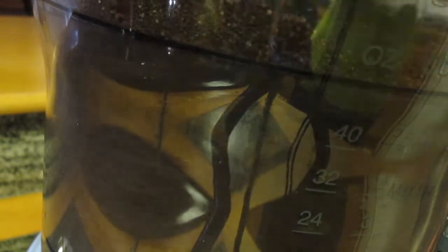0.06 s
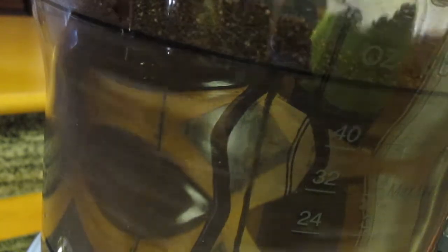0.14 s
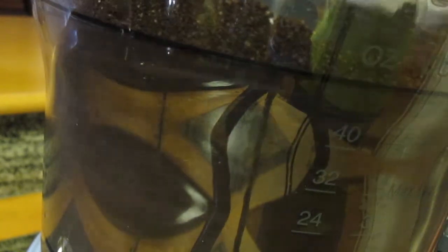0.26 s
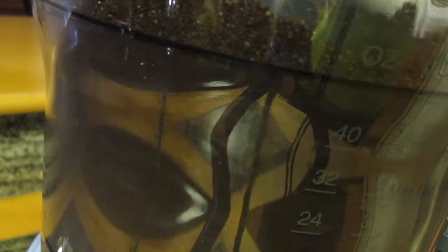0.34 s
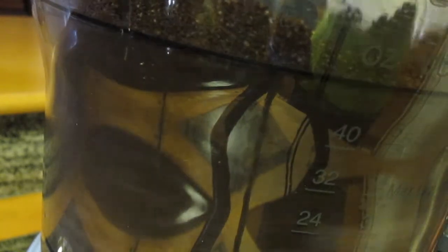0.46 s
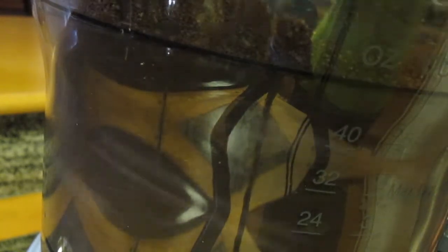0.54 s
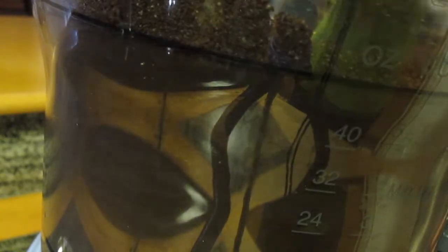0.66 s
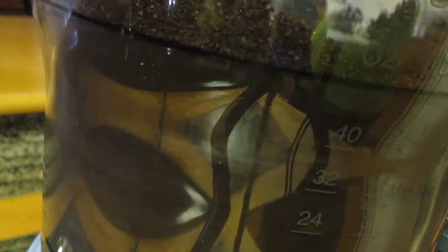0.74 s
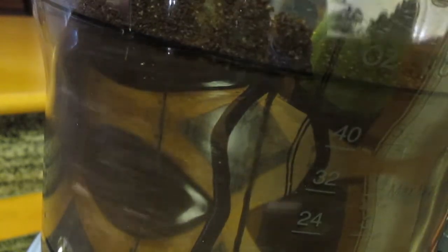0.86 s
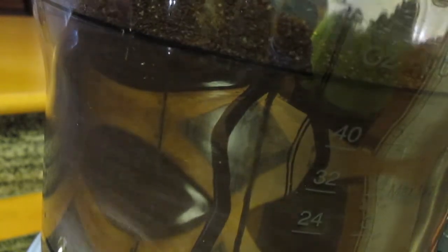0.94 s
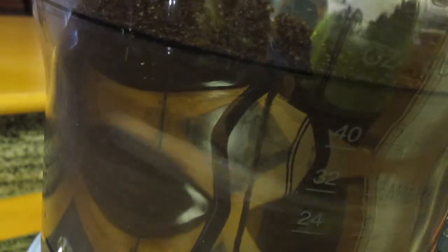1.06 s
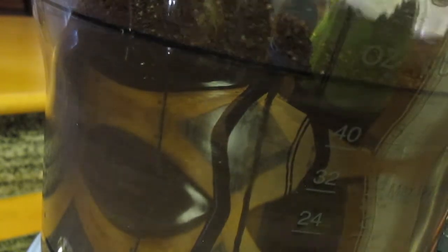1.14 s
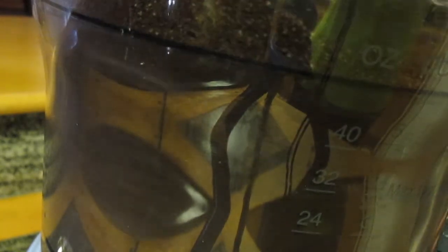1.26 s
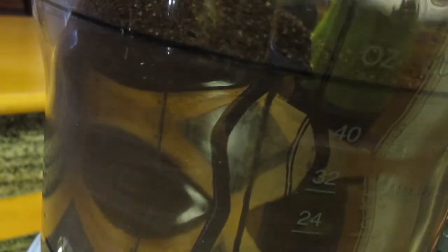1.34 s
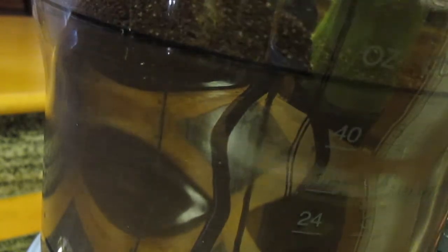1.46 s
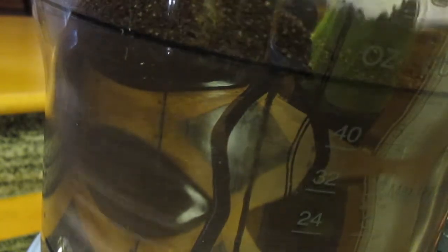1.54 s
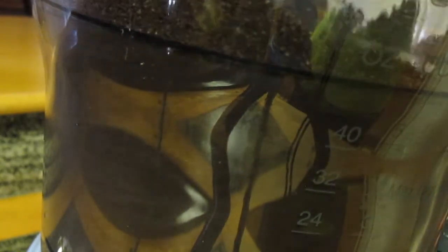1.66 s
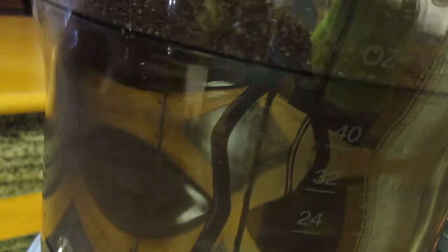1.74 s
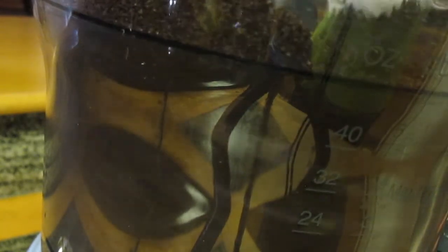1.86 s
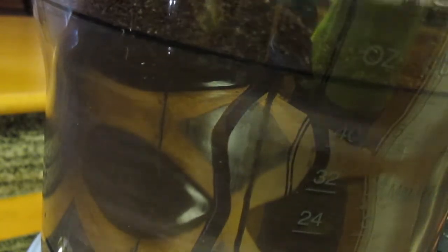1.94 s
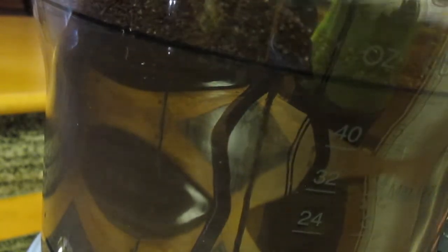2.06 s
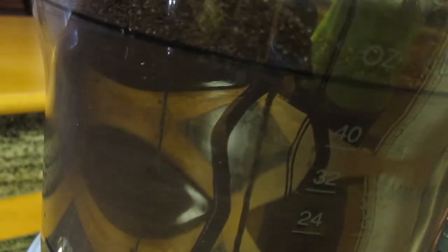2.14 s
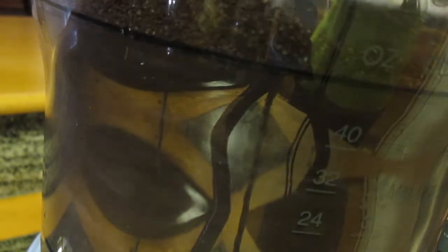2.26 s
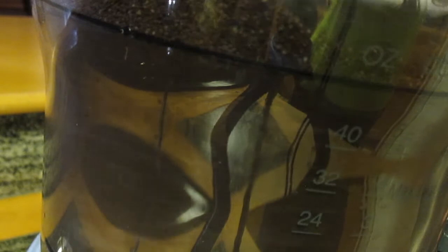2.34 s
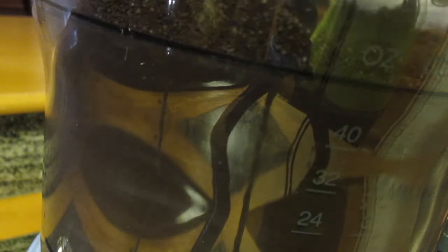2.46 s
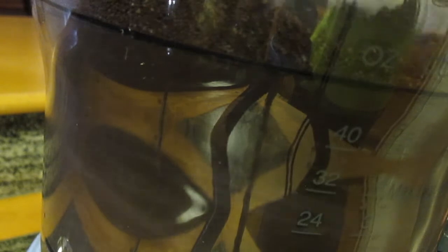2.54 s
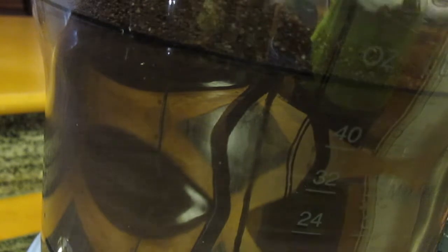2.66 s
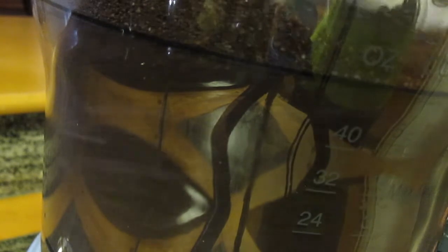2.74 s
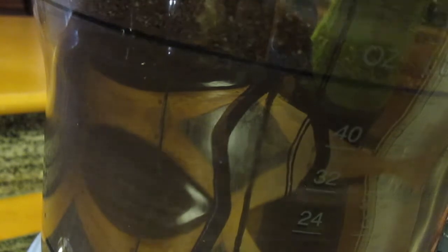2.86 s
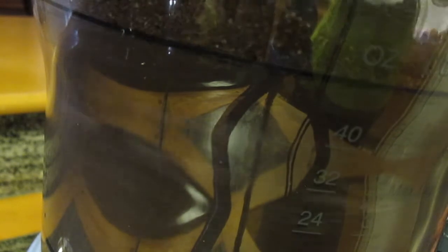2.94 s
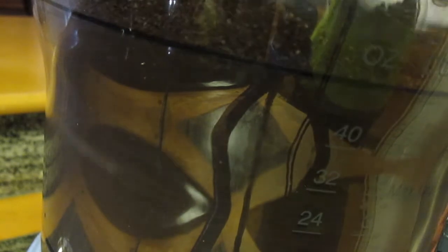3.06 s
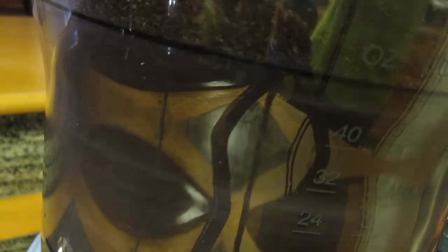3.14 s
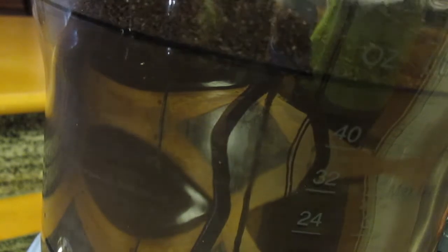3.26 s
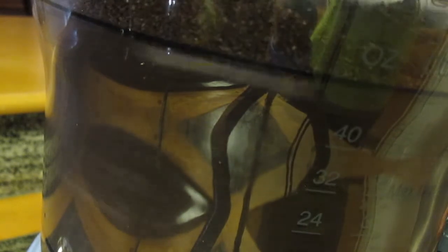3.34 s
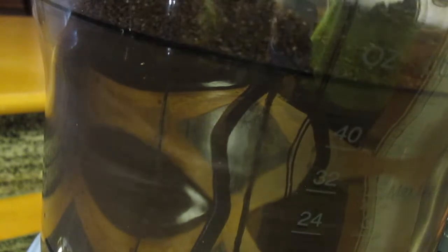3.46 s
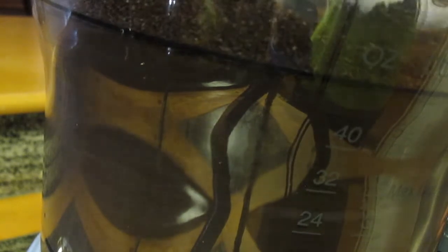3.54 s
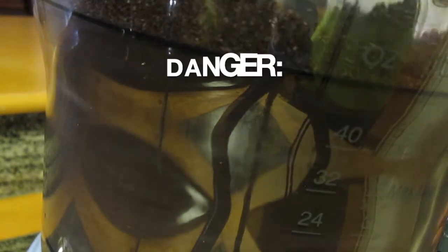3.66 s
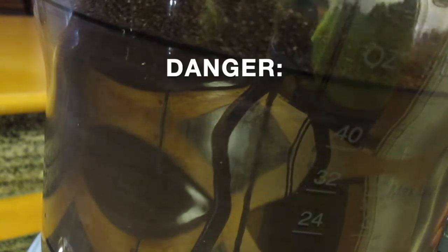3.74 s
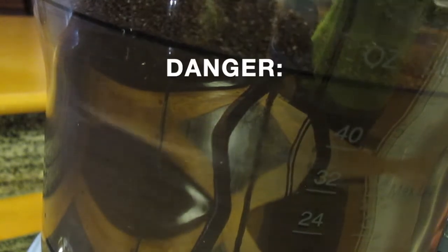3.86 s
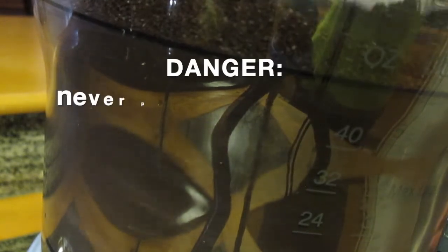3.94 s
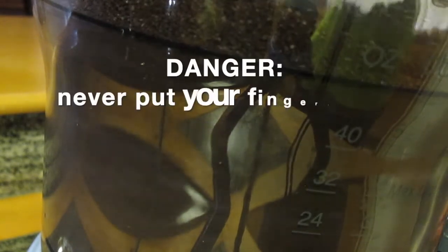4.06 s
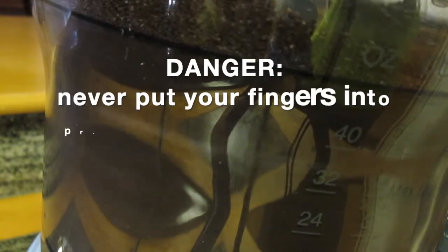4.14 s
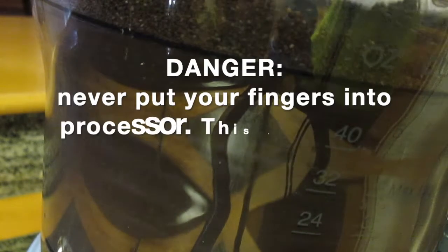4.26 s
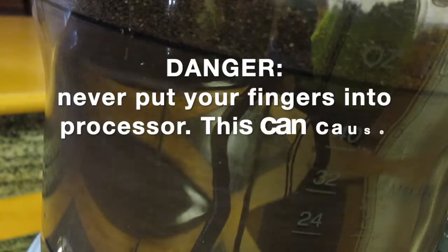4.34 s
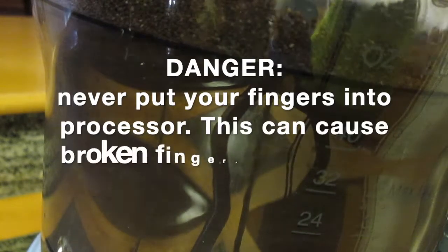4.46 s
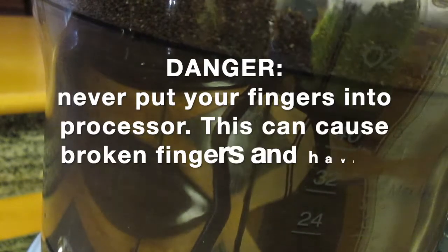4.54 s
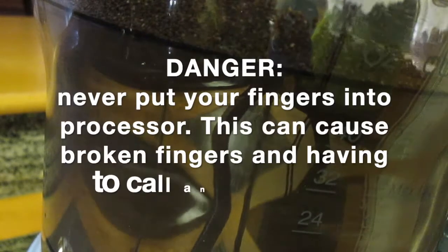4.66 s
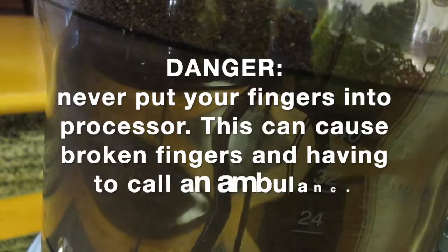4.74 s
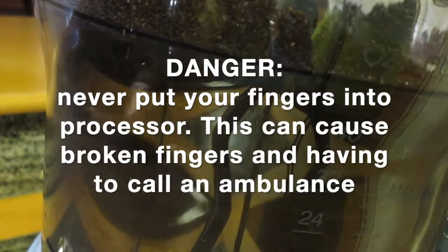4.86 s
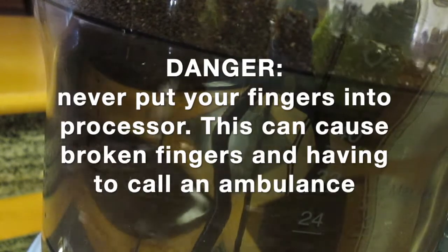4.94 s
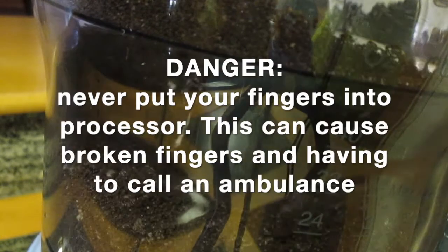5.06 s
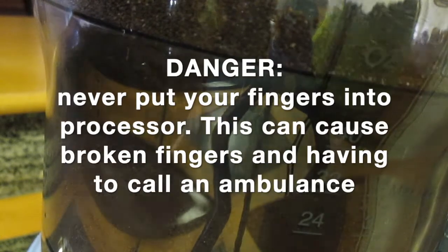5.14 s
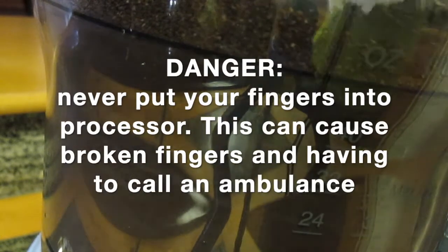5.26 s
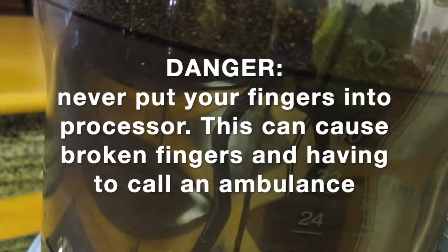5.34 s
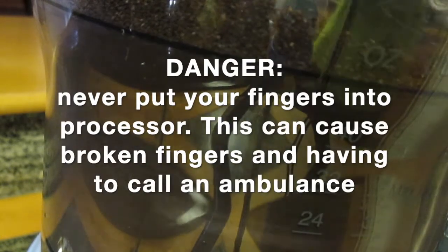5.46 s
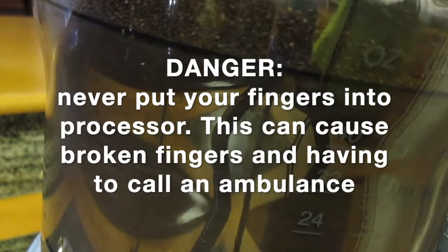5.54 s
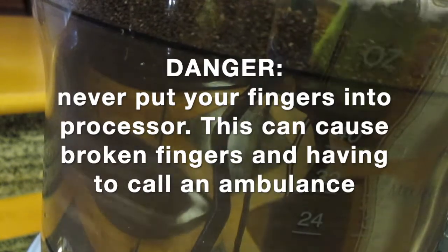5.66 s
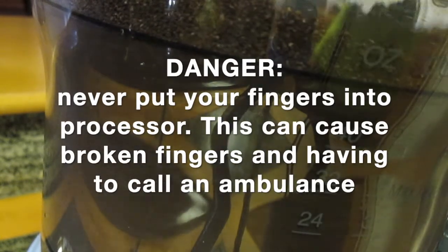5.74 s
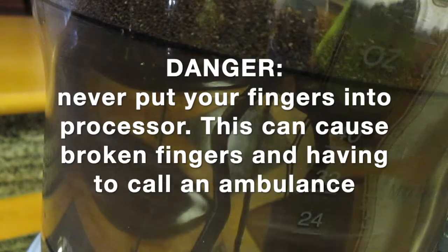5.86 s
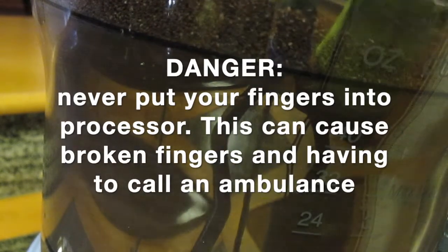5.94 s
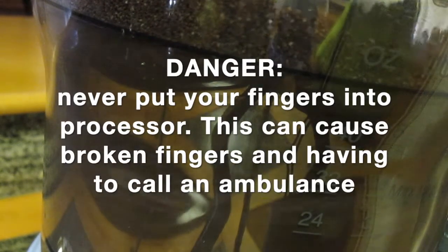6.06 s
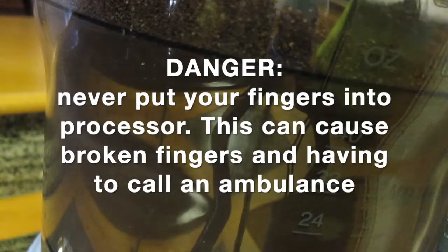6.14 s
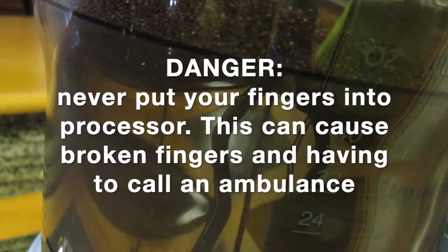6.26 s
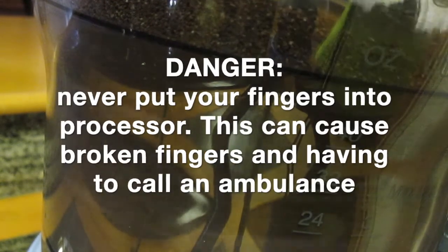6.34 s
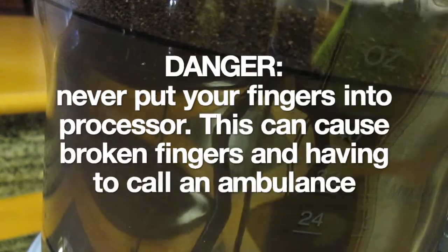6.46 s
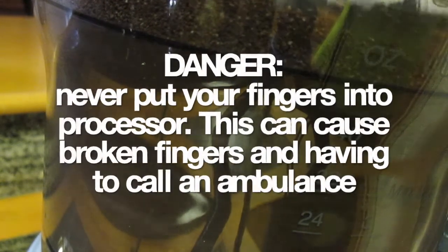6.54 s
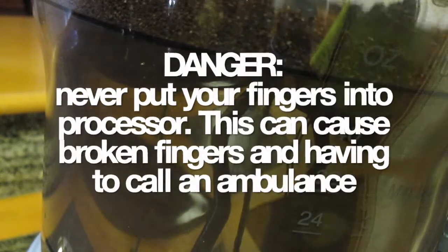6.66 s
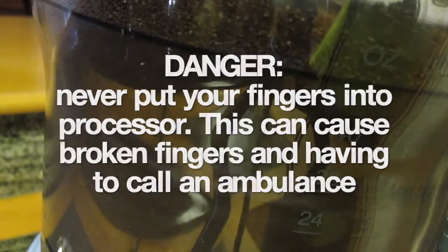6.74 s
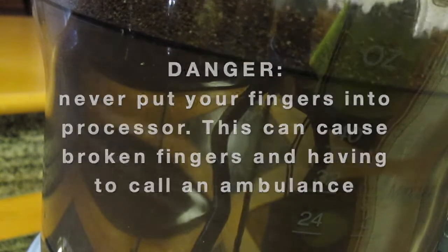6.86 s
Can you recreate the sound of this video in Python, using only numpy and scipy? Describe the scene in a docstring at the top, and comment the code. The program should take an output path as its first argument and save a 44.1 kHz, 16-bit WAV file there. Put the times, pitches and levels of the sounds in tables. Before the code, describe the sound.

Close to the microphone in a small kitchen, a food processor runs in seven pulses. Hard cookie pieces clatter against the plastic bowl, thump its base and snap, while crumbs tick brightly. After each release the rattle thins and the motor whine glides down into a brief quiet gap with faint hum. Later pulses last longer, and the final one runs to the end.

```python
"""Food processor chopping cookies

A food processor chops hard cookies in seven pulses, close to the microphone in a small kitchen.
The blade flings pieces at the plastic bowl: random blows ring the base (chunks) and the wall (bits),
and short noise bursts make the crumbs tick. Larger pieces snap now and then.
The motor, a stack of sine tones, whines up at each pulse and glides down as it coasts.
Quiet room air (shaped noise) and a faint steady hum lie underneath."""
import sys
import numpy as np
from scipy import signal
from scipy.fft import rfft, irfft
from scipy.io import wavfile
from scipy.ndimage import uniform_filter1d

SR = 44100
rng = np.random.default_rng(int(sys.argv[2]) if len(sys.argv) > 2 else 0)


def log_audio(samples):
    """Write samples as a 16-bit WAV file to the path given in sys.argv[1]."""
    # one column per channel
    frames = np.atleast_2d(samples).T
    # limit to full scale, then quantise
    limited = np.clip(frames, -1, 1)
    pcm = np.round(limited * 32767).astype(np.int16)
    wavfile.write(sys.argv[1], SR, pcm)


N = 304290  # samples, about 6.9 s
TIME = np.arange(N) / SR  # seconds
TAPS = 4096  # samples in one ring or spectrum response

# The switch is held down; the rattle weakens while it is:
# (on [s], off [s], rattle at start [dB], rattle at release [dB],
#  crumbs against rattle [dB], chunks against rattle [dB])
PULSES = [(-.12, 0.339, -12, -22, -11, -11.5), (0.919, 1.347, -15.5, -17.5, -11, -11.5),
          (1.844, 2.422, -16.5, -21, -10.5, -11.5), (2.77, 3.435, -15, -20, -10, -11),
          (3.709, 4.40, -15, -19, -10, -13), (5.126, 5.872, -14.5, -20, -11.5, -13),
          (6.118, 7.0, -15, -19, -10.5, -12)]
# The rattle surges or dips briefly, with heavier or lighter thumps:
# (time [s], length [s], rattle change [dB], extra change of chunks [dB])
SURGES = [(0.072, .04, 3.5, 4.5), (0.167, 0.019, -5, 10), (0.376, 0.033, 4.5, -5), (.484, 0.024, 4, -8),
          (.57, 0.048, 2, -6), (.62, .03, 1.5, -1), (.985, 0.016, 1, 2), (1.112, 0.13, 4, 1.5),
          (1.267, 0.025, 1.5, -2), (1.652, 0.043, -1.5, 0), (1.933, 0.11, 5, -1), (2.098, 0.038, 4.5, -6),
          (2.343, 0.083, 1.5, 2), (2.435, 0.034, 4.5, -3), (2.52, 0.11, 3.5, -1), (2.883, 0.016, 1, 9),
          (3.013, 0.092, 3.5, -1.5), (3.25, 0.031, 2, 0), (3.557, 0.026, 4, -8), (3.8, .03, 2, -2),
          (4.36, 0.072, 1, 5), (4.735, 0.12, 2.5, 6), (4.83, 0.033, 3.5, -3), (5.162, 0.068, 4, 2.5),
          (5.345, 0.031, 1, 5), (5.406, 0.0092, 3, 1), (5.799, 0.015, 5, -1), (5.945, .03, 3, 3),
          (6.035, 0.056, 5, 2), (6.15, 0.031, -0.5, 3), (6.356, 0.018, -0.5, 0)]
# A slower blade throws softer; the last three levels are set against the rattle:
# (share of full speed [0-1], rattle [dB], crumbs [dB], chunks [dB], whine [dB])
THROW_LEVELS = [(0, -37.5, 5, 11, -17), (.06, -26, 2.5, 0, -16), (.14, -17, -1.5, -4, -14),
                (.26, -10, -1.5, -1, -8.5), (.5, -4.5, -1, 1, -8.5), (.9, -1, -1.5, 1, -21),
                (1, -0.5, 1, -0.5, -17)]
# Ringing modes of the bowl and lid: (frequency [Hz], width [Hz], relative level [dB])
BOWL_MODES = [(489.2, 55.5, -6.5), (527, 4.7, -21), (601, 119, -7.5), (719, 53, -6.5), (812, 42, -5),
              (866, 17.4, -1.5), (918.3, 37.6, -0.5), (966, 34, -11), (1010, 134, -7), (1249, 66, -4.5),
              (1367, 156, -6.5), (1362, 84, -12.5), (1562, 15, -8), (1627, 35, -6), (1874, 113, -14),
              (2129, 64, -6.5), (2246, 8, -6.5), (2317, 114, -12), (2570, 123, -13), (2800, 74, -18.5),
              (2980, 180, -21.5), (3100, 106, -18.5), (3370, 63, -18.5), (3850, 190, -17.5)]
# The rattle's brightness wavers and is highest near the end: (time [s], treble change [dB])
BRIGHTNESS = [(0, 1), (1.3, -1), (2.5, 2), (4.2, 2), (5.5, 1), (6.6, 4)]
# Ringing modes of the motor base on the counter: (frequency [Hz], width [Hz], relative level [dB])
BASE_MODES = [(68, 23, -8), (101.7, 11, 2.5), (130.6, 29, -1), (148, 16, -4.5), (206, 54, -2.5),
              (226.3, 34, 0.5), (261.6, 20, 1), (324, 39, -7.5), (428, 134, -6.5)]
# Spectrum of a crumb's tick: (frequency [Hz], relative level [dB])
CRUMB_SPECTRUM = [(1500, -31), (3200, 5.5), (4300, 0), (5800, -1), (7500, -4.5), (8400, -2), (10500, -5.5),
                  (12000, -9), (14000, -15), (15700, -21)]
# Partials of the whine: (multiple of base pitch [ratio], typical level [dB])
WHINE_PARTIALS = [(1, -7), (1.5, -7.5), (2, -9), (2.5, -11), (3, 0.5), (4, -5.5), (5, -2)]
# Spectrum of the quiet kitchen's air: (frequency [Hz], relative level per Hz [dB])
AIR_SPECTRUM = [(15, -34), (25, 1), (172, 0), (250, -5), (691, -9), (811, -19), (978, -8), (2850, -53),
                (3090, -46), (6540, -28), (7090, -44), (15000, -44)]
# The blade snaps a large piece: (time [s], level [dB], knock against that level [dB])
SNAPS = [(.0737, -16, -8), (.1511, -20.5, -13), (.158, -14, -3), (.389, -15.5, -4), (.46, -20, 4),
         (.943, -15, -6), (1.0111, -16, -7), (1.2615, -14, 9), (1.3234, -14, 6), (2.143, -14, 6),
         (2.2293, -13, -11), (2.2762, -15, 4), (2.4894, -15.5, -2), (2.5691, -20, 2), (2.892, -15, 6),
         (2.9901, -10, -3), (3.0724, -10, 0), (3.1113, -11, 0), (3.243, -13.5, 7), (3.733, -13.5, -5),
         (3.983, -13, -6), (4.0607, -9, -14), (4.3031, -24, 1), (4.5594, -20.5, 2), (5.148, -10, -9),
         (5.2111, -6.5, 0), (5.3477, -14.5, 2), (5.4026, -14, 8), (5.743, -16.5, -5), (5.7972, -18, -9),
         (6.256, -10.5, -5), (6.295, -16, -3), (6.583, -12, -1), (6.8443, -13.5, 2)]
# The pulse switch clicks under the finger, loose bits settle:
# (time [s], level [dB], knock against that level [dB])
TICKS = [(.707, -32, 1), (.906, -52, 10), (1.814, -61, 35), (4.936, -37, -14), (5.03, -58, 14)]

SPIN_UP_S, COAST_S = .065, .28  # time constants of the motor
BITE_S = 0.022  # the first jolt sets the pieces flying well before the blade is up to speed
FRICTION = .13  # dry friction that stops the blade, as a share of the drag at full speed
CRUMB_FADE_DB, CRUMB_LAG_S = -1, 0.033  # crumbs start a little quieter: they have yet to be cut
TOP_SPEED_HZ = 2540  # base pitch of the whine at full speed
WHINE_WOBBLE = .015  # spread of the pitch, as a share of it
WHINE_DIRECT = .34  # gain of the whine that does not pass through the bowl
BURIED_DB = -8  # while the blade spins up, the first rush of pieces buries the whine
AIR_DB, HUM_DB, HUM_HZ = -48.5, -53, 60.7
NOTCH_HZ, TOP_HZ = 7850, 15550


def undb(db):
    """Turn decibels into a gain."""
    return 10 ** (np.asarray(db) / 20)


def unit(x):
    """Scale a signal to an average (rms) size of 1."""
    return x / np.sqrt(np.mean(x ** 2))


def walk(rate):
    """Smooth random curve that turns about rate times a second; spread 1."""
    width = max(int(SR / rate), 1)
    smoothed = uniform_filter1d(rng.standard_normal(N), width)
    return unit(uniform_filter1d(smoothed, width // 2 + 1))


def through(x, response):
    """Pass a sound through a body or room, given that body's response to one click."""
    return signal.oaconvolve(x, response)[:N]


def band(x, lo_hz, hi_hz, order=4):
    """Keep what lies between two frequencies."""
    edges = [lo_hz, min(hi_hz, SR / 2.1)]
    return signal.sosfilt(signal.butter(order, edges, "band", fs=SR, output="sos"), x)


def colour(points):
    """Make a click response with the given spectrum and its energy as early as possible."""
    hz, db = np.transpose(points)
    grid_hz = np.fft.rfftfreq(TAPS, 1 / SR)
    gain = undb(np.interp(np.log(grid_hz + 1), np.log(hz), db))
    # folding the cepstrum makes the response start at once (minimum phase)
    cepstrum = irfft(np.log(gain))
    cepstrum[1:TAPS // 2] *= 2
    cepstrum[TAPS // 2 + 1:] = 0
    return irfft(np.exp(rfft(cepstrum)))


def places(modes, count):
    """The ring of one body struck at several places; each place weights the modes anew."""
    hz, width, db = np.transpose(modes)[:, :, None]
    t = TIME[:TAPS]
    decay = np.exp(-np.pi * width * t)  # a wider mode dies sooner
    rings = undb(db) * width * decay * np.cos(2 * np.pi * hz * t)
    weights = rng.standard_normal((count, len(modes)))
    weights = weights / np.sqrt(np.mean(weights ** 2, axis=0))
    return weights @ rings


def blows(rate, spread_db):
    """Random impacts, rate a second, of uneven size and mean power 1."""
    chance = np.clip(rate / SR, 0, 1)
    size = unit(undb(spread_db * np.clip(rng.standard_normal(N), -2, 2)))
    hits = rng.random(N) < chance
    direction = rng.choice([-1, 1], N)
    return hits * direction * size / np.sqrt(chance)


def pelt(responses, rate, spread_db, swarm):
    """Share impacts among several responses; the swarm curve makes them swell together."""
    share = rate / len(responses)
    return sum(through(blows(share, spread_db) * swarm, response) for response in responses)


def fractures(decay_s, count, ring=0.54, attack_s=.0001):
    """Short crunches of brittle crumbs: each is a noise burst with a ping at its own pitch."""
    t = TIME[:TAPS // 4]
    ping_hz = np.geomspace(3600, 12000, count)[rng.permutation(count), None]
    grain = rng.standard_normal((count, len(t)))
    bursts = grain + ring * np.sin(2 * np.pi * ping_hz * t)
    swell = (1 - np.exp(-t / attack_s)) * np.exp(-t / decay_s)
    return signal.fftconvolve(bursts * swell, colour(CRUMB_SPECTRUM)[None, :len(t)], axes=1)


def spin(rise_s):
    """Share of full speed: it climbs while the switch is down, then drag and friction slow it."""
    speed = np.zeros(N)
    for on, off, *_ in PULSES:
        start = np.interp(on, TIME, speed)
        held_s = np.clip(TIME - on, 0, off - on)
        driven = 1 - (1 - start) * np.exp(-held_s / rise_s)
        released_s = np.maximum(TIME - off, 0)
        coasting = (driven + FRICTION) * np.exp(-released_s / COAST_S) - FRICTION
        speed = np.where(TIME >= on, np.maximum(coasting, 0), speed)
    return speed


def throw(share):
    """Levels of rattle, crumbs, chunks and whine at a share of full speed."""
    shares, *columns = np.transpose(THROW_LEVELS)
    return [np.interp(share, shares, db) for db in columns]


def load():
    """Levels of rattle, crumbs and chunks: they follow the blade's speed, with brief surges and dips."""
    rattle_db, crumb_db, chunk_db, _ = throw(spin(BITE_S))
    next_on = [pulse[0] for pulse in PULSES[1:]] + [np.inf]
    for (on, off, start_db, release_db, crumbs_db, chunks_db), until in zip(PULSES, next_on):
        now = (TIME >= on) & (TIME < until)
        rattle_db[now] += np.interp(TIME[now], [on, off], [start_db, release_db])
        crumb_db[now] += crumbs_db + CRUMB_FADE_DB * np.exp((on - TIME[now]) / CRUMB_LAG_S)
        chunk_db[now] += chunks_db
    for s, length_s, change_db, chunks_db in SURGES:
        bump = np.exp(-(2 * (TIME - s) / length_s) ** 2)
        rattle_db += change_db * bump
        chunk_db += chunks_db * bump
    return rattle_db, crumb_db, chunk_db


def rattling_bits(busy, handfuls):
    """Bits hit the bowl wall and make it ring; the brightness of the rattle wavers."""
    wall = places(BOWL_MODES, count=40)
    hits = pelt(wall, 2000 * busy, spread_db=2.5, swarm=undb(handfuls))
    bits = band(hits, 430, 4600, order=5)
    upper = signal.sosfiltfilt(signal.butter(2, 2100, "high", fs=SR, output="sos"), bits)
    treble_gain = undb(np.interp(TIME, *np.transpose(BRIGHTNESS)))
    return unit(bits + (treble_gain - 1) * upper)


def thumping_chunks(busy, handfuls):
    """Heavy chunks thump the base and set off its low modes."""
    base = places(BASE_MODES, count=18)
    hits = pelt(base, 480 * busy, spread_db=2, swarm=undb(0.24 * handfuls))
    return unit(band(hits, 54, 340, order=3))


def ticking_crumbs(busy, handfuls):
    """Brittle crumbs break in many tiny bursts, with a faster flicker of their own."""
    crunches = fractures(decay_s=0.0034, count=32)
    swarm = undb(handfuls + .5 * walk(120))
    return unit(pelt(crunches, 1700 * busy, spread_db=5.5, swarm=swarm))


def chopping(speed, crumb_db, chunk_db):
    """Pieces strike more often as the blade speeds up, in handfuls as it sweeps the heap."""
    busy = .8 + .8 * speed
    handfuls = 1.17 * walk(61)  # dB
    bits = rattling_bits(busy, handfuls)
    chunks = undb(chunk_db + 0.5) * thumping_chunks(busy, handfuls)
    crumbs = undb(crumb_db + 1.0) * ticking_crumbs(busy, handfuls)
    return bits + chunks + crumbs


def motor(hz):
    """An unsteady whine whose partials flare and fade as they sweep across the bowl's resonances."""
    phase = 2 * np.pi * np.cumsum(hz * (1 + WHINE_WOBBLE * walk(73.7))) / SR
    whine = 0
    for (multiple, db), wall in zip(WHINE_PARTIALS, places(BOWL_MODES, count=len(WHINE_PARTIALS))):
        flare_db = 10.3 * np.tanh(walk(55))
        tone = np.sin(round(2 * multiple) / 2 * phase)  # whole and half multiples only
        partial = undb(db + flare_db) * tone
        wall = wall / np.abs(rfft(wall)).max()  # strongest resonance has gain 1
        whine = whine + WHINE_DIRECT * partial + through(partial, wall)
    return unit(band(whine, 480, 2300, order=2))


def background():
    """Still room air, as shaped noise, and a mains hum, as one low sine tone."""
    air = unit(through(rng.standard_normal(N), colour(AIR_SPECTRUM)))
    hum = unit(np.sin(2 * np.pi * HUM_HZ * TIME))
    return undb(AIR_DB) * air + undb(HUM_DB) * hum


def kitchen(x, t60_s, wet_db):
    """Cupboards and tiles return a short, slightly duller tail."""
    t = TIME[:SR // 2]
    noise = band(rng.standard_normal(len(t)), 63, 9700, order=1)
    tail = noise * undb(-60 * t / t60_s) * (t > .004)  # silent for the first 4 ms
    return x + undb(wet_db) * through(x, tail / np.linalg.norm(tail))


def cracks(events):
    """A piece breaks over a few milliseconds, and its fragments knock on the bowl wall."""
    out = np.zeros(N + TAPS)
    t = TIME[:TAPS // 4]
    crunches = fractures(decay_s=0.0063, count=len(events), ring=0.3, attack_s=0.0025)
    walls = places(BOWL_MODES, count=len(events))
    for (s, db, body_db), crunch, wall in zip(events, crunches, walls):
        start = int(s * SR)
        crunch = band(crunch, 1700, 9200, order=1)  # a large piece is duller than a crumb
        fragments = rng.standard_normal(len(t)) * t * np.exp(-t / 0.0039)
        knock = band(signal.fftconvolve(wall, fragments)[:TAPS], 470, 4800, order=2)
        # the crunch peaks 1 dB above the table's level
        out[start:start + len(crunch)] += undb(db + 1.0) * crunch / np.abs(crunch).max()
        out[start:start + TAPS] += undb(db + body_db) * knock / np.abs(knock).max()
    return out[:N]


def scene():
    """The running machine; the whine stands out once the load settles and the blade coasts."""
    speed = spin(SPIN_UP_S)
    rattle_db, crumb_db, chunk_db = load()
    speeding_up = 1. * (np.gradient(speed) * SR > 1)  # gains more than full speed per second
    spinning_up = uniform_filter1d(speeding_up, TAPS // 8)
    whine_db = throw(speed)[-1] + BURIED_DB * spinning_up
    pieces = chopping(speed, crumb_db, chunk_db)
    whine = undb(whine_db) * motor(TOP_SPEED_HZ * speed)
    machine = undb(rattle_db) * (pieces + whine)
    sound = machine + cracks(SNAPS) + cracks(TICKS)
    return (kitchen(sound, t60_s=0.22, wet_db=-16) + background())[None]


def record(dry):
    """The microphone has a narrow treble notch; gain control eases loud surges; the top is cut."""
    notched = signal.lfilter(*signal.iirnotch(NOTCH_HZ, 36, fs=SR), dry)
    loudness = np.sqrt(uniform_filter1d(notched ** 2, TAPS // 6) + 1e-12)
    # only what rises above -16 dB is turned down, by a quarter of the excess
    eased = notched * np.minimum(1, undb(-16.0) / loudness) ** 0.25
    return signal.sosfilt(signal.ellip(10, .2, 80, TOP_HZ, fs=SR, output="sos"), eased)


dry = scene()
out = record(dry)
log_audio(out)
```